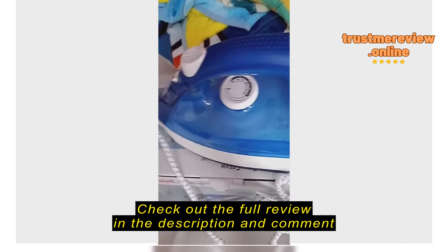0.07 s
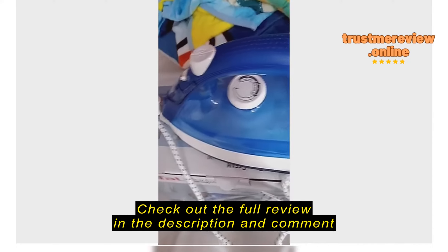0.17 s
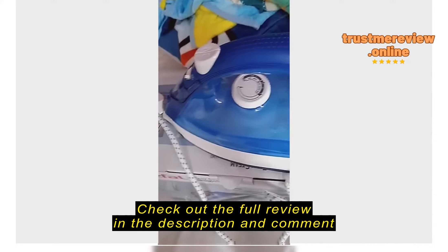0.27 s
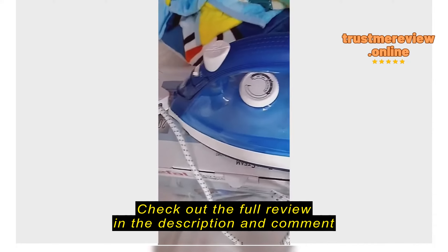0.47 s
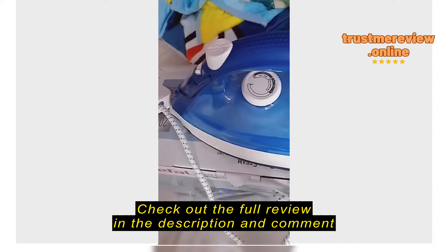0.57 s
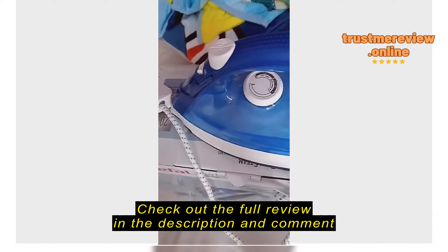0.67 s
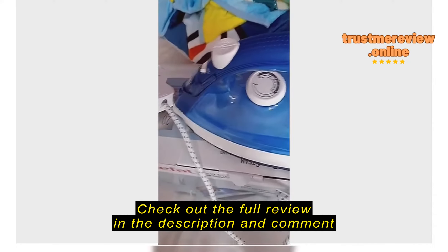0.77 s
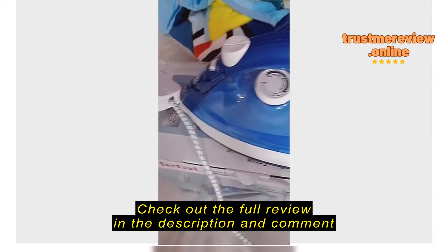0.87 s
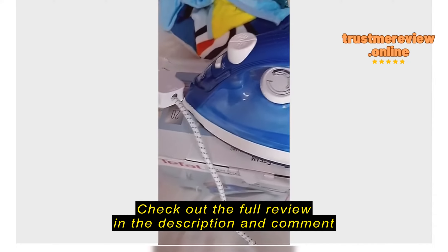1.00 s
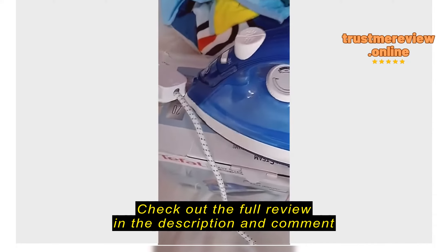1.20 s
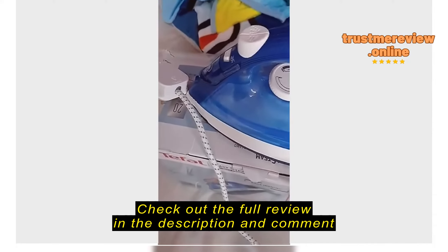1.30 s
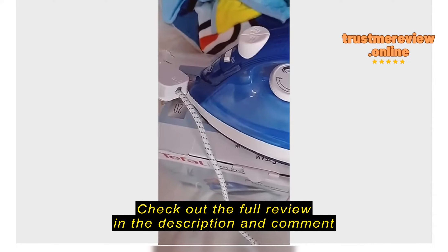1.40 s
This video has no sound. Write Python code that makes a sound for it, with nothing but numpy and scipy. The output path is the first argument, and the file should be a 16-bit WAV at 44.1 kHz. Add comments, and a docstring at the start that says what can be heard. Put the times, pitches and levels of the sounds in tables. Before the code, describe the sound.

Low handling thumps and one harder knock on a microphone, over steady room hum.

```python
"""A quiet room rumbles, hisses and hums throughout. From the start, fingers shift on the casing of a
hand-held camera, beside the right microphone: a faint shuffle, then soft, dull thumps as they rock it.
At 0.46 s one harder knock rings the casing and makes the gain control turn the room down.
Softer thumps follow while the gain creeps back. The left microphone hardly picks up the handling."""
import sys
import numpy as np
from scipy import signal
from scipy.fft import rfft, irfft
from scipy.io import wavfile
from scipy.ndimage import uniform_filter1d

SR = 44100
rng = np.random.default_rng(int(sys.argv[2]) if len(sys.argv) > 2 else 0)


def store_pcm(level_fs):
    """Save levels as 16-bit WAV."""
    pcm = np.round(np.clip(level_fs, -1, 1) * 32767).astype(np.int16)
    wavfile.write(sys.argv[1], SR, np.atleast_2d(pcm).T)


N = 63945


def amp(db):
    """Decibels to gain."""
    return 10 ** (np.asarray(db) / 20)


def unit_rms(x):
    """Scales to an rms of one."""
    return x / np.sqrt(np.mean(x ** 2) + 1e-20)


def curve_at(points, hz):
    """Interpolates a table on a log-frequency axis."""
    points_hz, values = np.transpose(points)
    return np.interp(np.log(hz + 1), np.log(points_hz + 1), values)


def band_noise(gain):
    """Unit-rms noise shaped by a gain per frequency."""
    return unit_rms(irfft(rfft(rng.standard_normal(N)) * gain, N))


# Room noise spectrum (frequency [Hz], relative density [dB])
ROOM_SPECTRUM = [(25, -30), (50, -14.5), (90, 0), (150, -7), (210, -1.5), (265, -2.5), (340, -3),
                 (440, -5.5), (520, -14), (650, -11), (950, -13.5), (1250, -10.5), (1750, -13.5),
                 (2300, -21), (2900, -21.5), (3500, -27), (5500, -32), (8000, -37.5), (10500, -37.5),
                 (13000, -35), (15400, -37)]
# Left-right likeness (frequency [Hz], coherence [0-1])
ROOM_COHERENCE = [(60, 0.6), (130, 1), (290, 0.87), (640, 0.63), (1400, 0.41), (3100, .18), (6800, 0),
                  (15000, 0.04)]
# Stereo balance (frequency [Hz], left minus right [dB])
ROOM_BALANCE = [(60, -2), (120, 5), (200, -1.5), (380, -7.5), (700, 5.5), (1300, -2), (2400, -2), (4400, 0),
                (15000, 1)]


def room_noise(level_db=-44.5, patch_db=1.27, swell_db=0.24, fft_size=2048):
    """Steady rumble and hiss with faint drifting patches; alike in both channels only in the bass."""
    hop = fft_size // 4
    frames = N // hop + 5
    hz = np.fft.rfftfreq(fft_size, 1 / SR)
    draws = rng.standard_normal((frames, len(hz), 5))
    left = draws[..., 0] + 1j * draws[..., 1]
    independent = draws[..., 2] + 1j * draws[..., 3]
    coherence = curve_at(ROOM_COHERENCE, hz)
    right = coherence * left + np.sqrt(1 - coherence ** 2) * independent
    drift = uniform_filter1d(draws[..., 4], size=6, axis=0)
    patches = unit_rms(uniform_filter1d(drift, size=20, axis=1))
    swell = unit_rms(uniform_filter1d(rng.standard_normal(frames), size=8))[:, None]
    shape_db = curve_at(ROOM_SPECTRUM, hz) + patch_db * patches + swell_db * swell
    lean = amp(curve_at(ROOM_BALANCE, hz) / 2)
    spectra = np.array([left * lean, right / lean]) * amp(shape_db)
    _, noise = signal.istft(spectra.swapaxes(-1, -2), nperseg=fft_size, noverlap=fft_size - hop)
    return amp(level_db) * unit_rms(noise[:, :N])


# Room hum bands (centre [Hz], width [Hz], rms level [dB])
HUM_BANDS = [(194.3, 18, -56), (306, 33, -51.5), (428.3, 31, -57.5)]


def room_hum(left_db=-2.5):
    """Narrow noise bands, heard as a wavering hum in both channels."""
    hz = np.fft.rfftfreq(N, 1 / SR)
    hum = sum(amp(db) * band_noise(np.exp(-2 * ((hz - centre_hz) / width_hz) ** 2))
              for centre_hz, width_hz, db in HUM_BANDS)
    return hum * np.array([[amp(left_db)], [1]])


def grip_shuffle(level_db=-43.5, low_hz=34.8, high_hz=85, swell_db=2.5, swell_hz=6):
    """Skin creeps on the casing: a faint, uneven low shuffle."""
    hz = np.fft.rfftfreq(N, 1 / SR) + 1
    rub = band_noise(1 / (1 + (low_hz / hz) ** 4 + (hz / high_hz) ** 4))
    swell = band_noise(np.exp(-hz / swell_hz))
    return amp(level_db) * unit_rms(rub * amp(swell_db * swell))


# Finger pushes on the casing (time [s], peak [dB], contact [ms], resonance [Hz], Q [-])
FINGER_PUSHES = [(.072, -35.5, 4.4, 55, 2.3), (0.109, -36, 5.1, 72, 1.6), (0.227, -14, 1.37, 62.4, 1.66),
                 (.328, -25, 1.66, 70, 3), (0.357, -19.5, 1.2, 100, 1.6), (.365, -14, 2.2, 82, 1.7),
                 (0.377, -17, 1.66, 66.3, 0.55), (.457, 1.5, 0.67, 200, 1.37), (.465, 0.5, 0.71, 104, 1.65),
                 (.472, -12.5, 0.68, 171, 1.4), (.478, -7.5, 1, 42, .9), (0.492, -23, 2.6, 42, 1.9),
                 (0.616, -28, 1.9, 85, 2.2), (0.628, -16, 1.43, 78.7, 4.5), (.652, -14.5, 0.66, 120.4, 2.5),
                 (.662, -13.5, 0.76, 129, 0.95), (0.671, -24, 3.1, 62.3, 2.5), (0.721, -29.5, 1.4, 75, 1.7),
                 (.733, -24.5, 1.65, 61, 1.7), (0.813, -25, 1.7, 87.5, 1.6), (0.926, -26.5, 1.2, 70, 1.1),
                 (.939, -15.5, 1.73, 54, 1.77), (1.033, -27.5, 1.3, 85, 1.5), (1.045, -16, 1.16, 84, 1.63),
                 (1.051, -22, 0.7, 170, 1.8), (1.07, -19.5, 1.4, 116, 1.9), (1.089, -23, 2, 55, 0.95),
                 (1.179, -16.5, 0.82, 77.4, 4.3), (1.226, -18, 1.45, 82, 1.5),
                 (1.365, -28.5, 1.5, 76.6, 3.1), (1.393, -27.5, 2.1, 81, 1.4)]


def finger_thumps(mic_low_hz=38.4):
    """Each push rocks the casing; the grip damps it within a few swings."""
    t = np.arange(N) / SR
    mic_highpass = signal.butter(2, mic_low_hz, "high", fs=SR, output="sos")
    thumps = np.zeros(N)
    for at_s, peak_db, contact_ms, ring_hz, q in FINGER_PUSHES:
        offset_ms = (t - at_s) * 1000
        push = -1 / np.cosh(np.clip(offset_ms / contact_ms, -40, 40))
        omega = 2 * np.pi * ring_hz
        resonance = signal.bilinear([1, 0, 0], [1, omega / q, omega ** 2], SR)
        rocking = signal.lfilter(*resonance, push)
        thump = signal.sosfilt(mic_highpass, rocking)
        thumps += amp(peak_db) * thump / abs(thump).max()
    return thumps


# Casing modes (frequency [Hz], level [dB], T60 [s])
CASING_MODES = [(436, -20, 0.053), (590, -41, 0.038), (750, -22, 0.027), (1210, -46, 0.034),
                (1470, -43, 0.053)]


def knock_ring(at_s=0.457, rise_s=0.00403):
    """The hardest push rings the casing's modes briefly."""
    age_s = np.maximum(np.arange(N) / SR - at_s, 0)
    ring = sum(amp(db - 60 * age_s / t60_s) * np.sin(2 * np.pi * hz * age_s)
               for hz, db, t60_s in CASING_MODES)
    return np.minimum(age_s / rise_s, 1) * ring


def gain_control(x, threshold_db=-5.5, share=0.4, recovery_db_per_s=0.53):
    """Cuts the gain by a share of the peak's excess over the threshold, then recovers slowly."""
    peak_db = 20 * np.log10(abs(x).max(0) + 1e-9)
    demand_db = share * np.maximum(peak_db - threshold_db, 0)
    recovery_db = recovery_db_per_s * np.arange(N) / SR
    cut_db = np.maximum.accumulate(demand_db + recovery_db) - recovery_db
    return x * amp(-uniform_filter1d(cut_db, size=200))


def scene(left_leak_db=-44):
    """Room in both channels, handling almost wholly in the right."""
    room = room_noise() + room_hum()
    handling = grip_shuffle() + finger_thumps() + knock_ring()
    return room + handling * np.array([[amp(left_leak_db)], [1]])


def record(dry, cutoff_hz=15500):
    """Gain control, then a steep low-pass."""
    lowpass = signal.firwin(511, cutoff_hz, window=("kaiser", 9), fs=SR)
    return signal.oaconvolve(gain_control(dry), lowpass[None], "same")


dry = scene()
out = record(dry)
store_pcm(out)
```